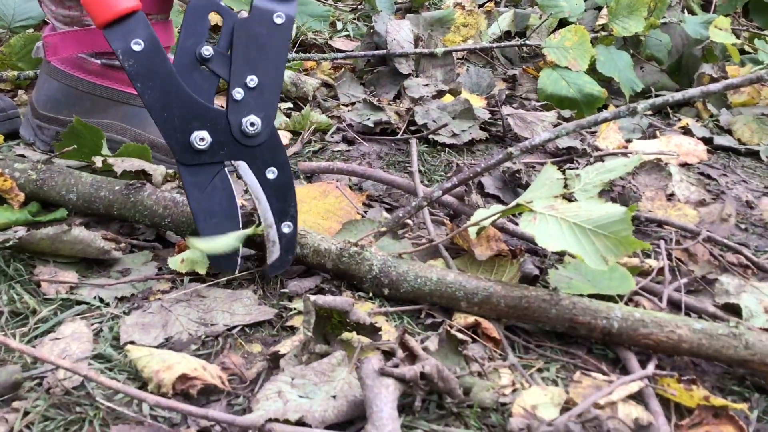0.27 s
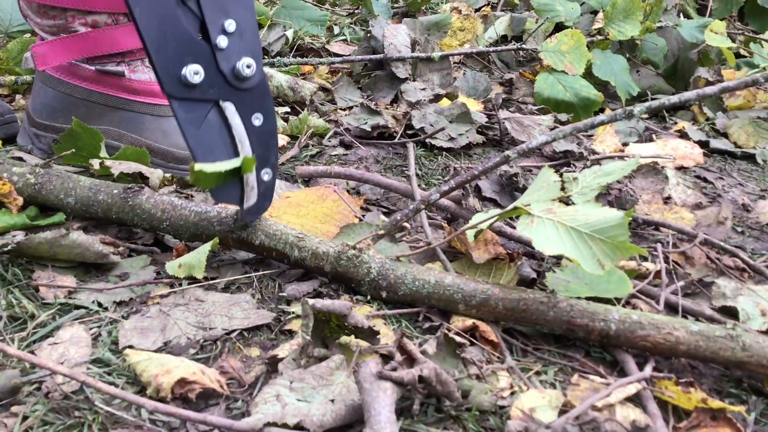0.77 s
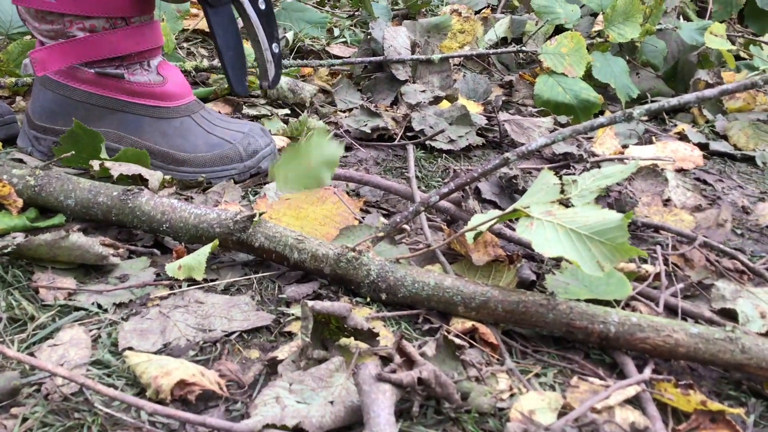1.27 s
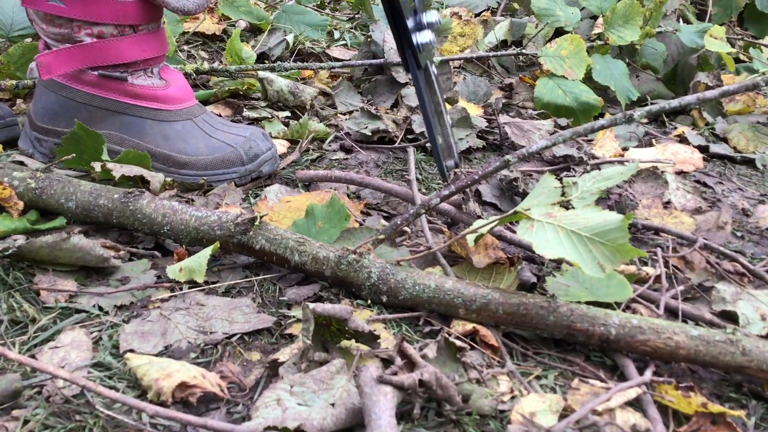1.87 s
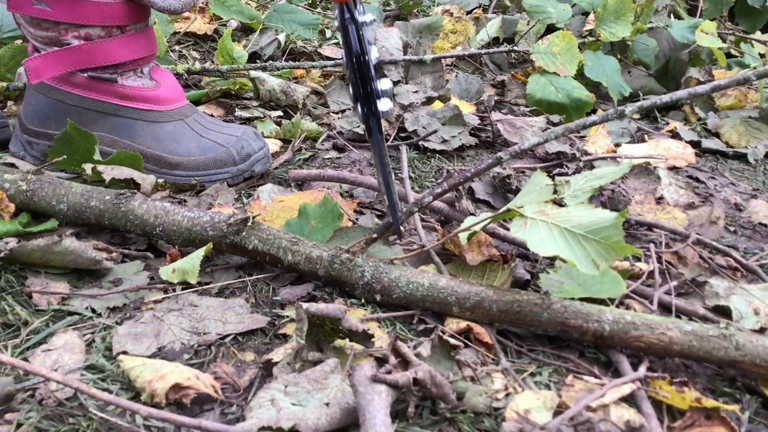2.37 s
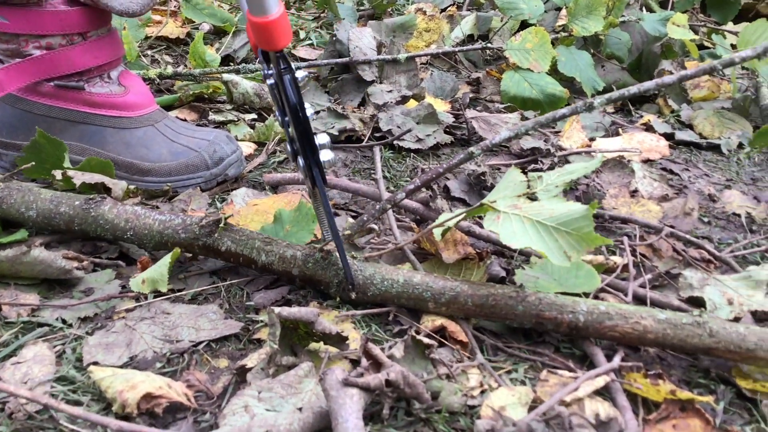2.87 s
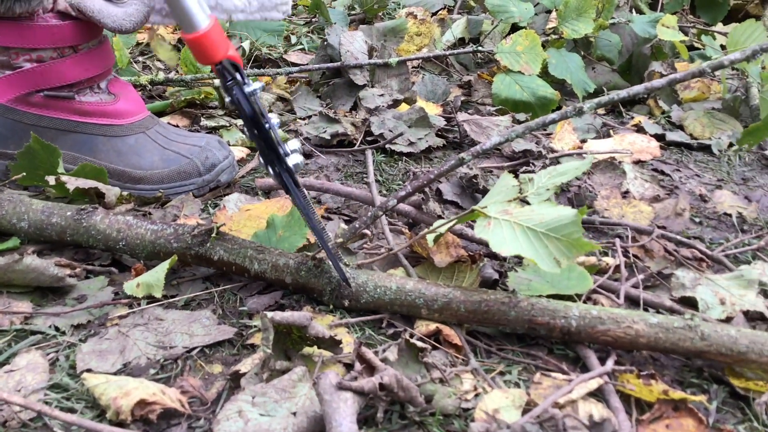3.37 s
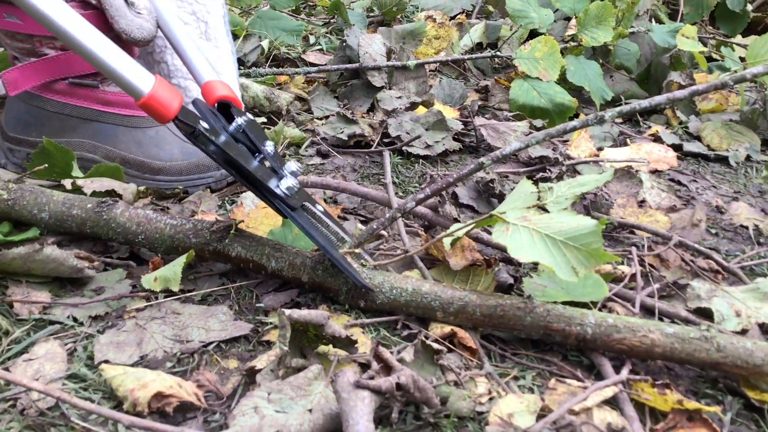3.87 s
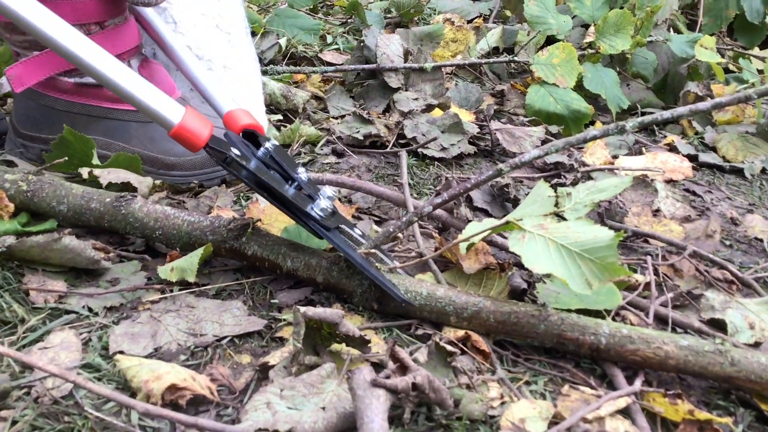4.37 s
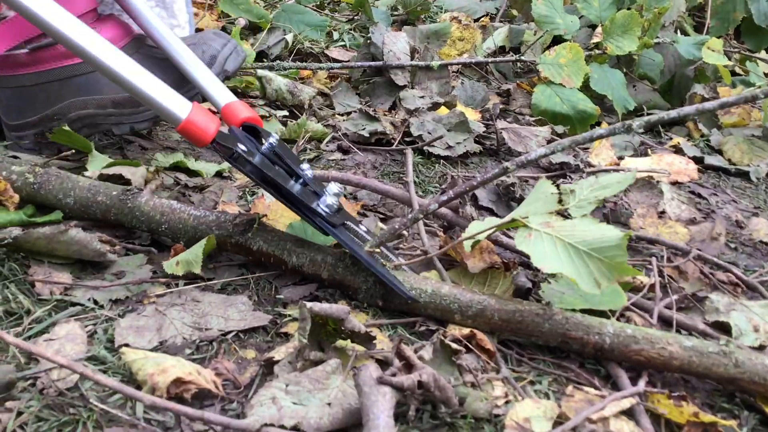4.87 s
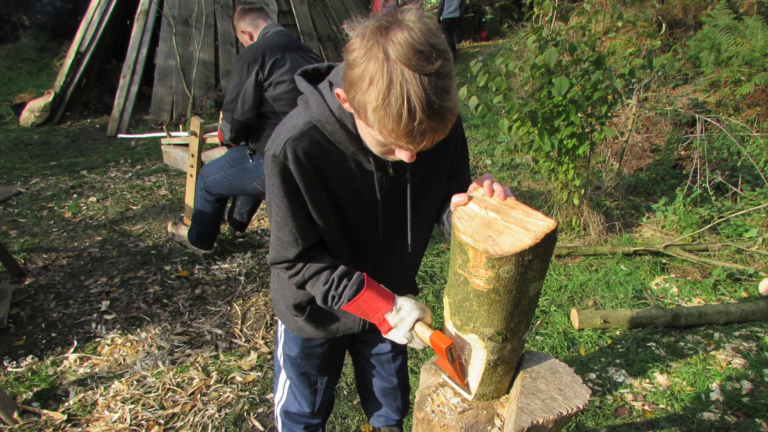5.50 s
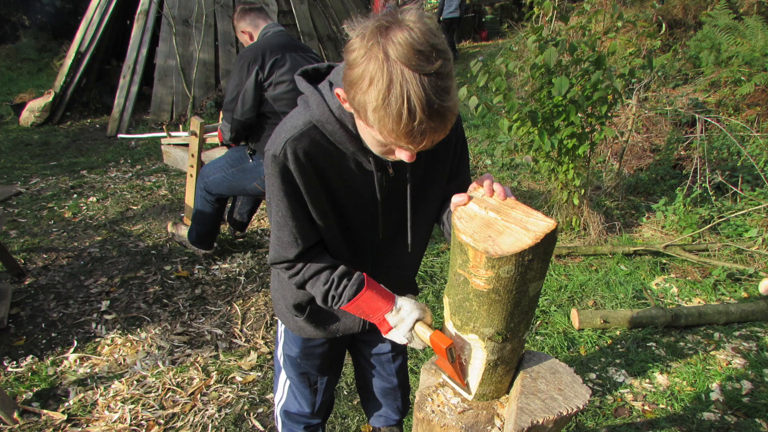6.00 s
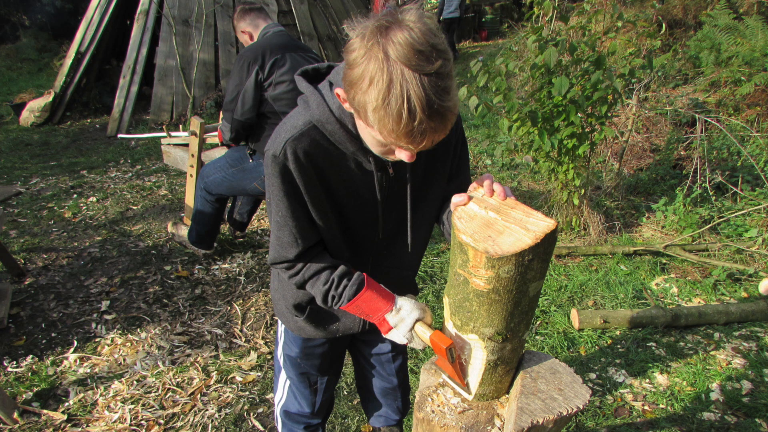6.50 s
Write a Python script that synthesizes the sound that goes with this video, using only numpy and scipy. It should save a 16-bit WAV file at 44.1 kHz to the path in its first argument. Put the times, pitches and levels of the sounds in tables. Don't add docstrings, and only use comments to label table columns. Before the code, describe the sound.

Very close in a quiet wood, long-handled steel loppers tick, then slam shut with a bright hard clack and short metallic ring. Dry leaves and twigs rustle and crackle faintly as the tool is repositioned, with a distant thin bird whistle. After a long quiet stretch the jaws snap loudly through a branch, which tears, crackles and settles before one last smaller clack. Faint low wind rumble on the microphone.

```python
import sys
import numpy as np
from scipy import signal
from scipy.fft import rfft, irfft, next_fast_len
from scipy.io import wavfile
from scipy.ndimage import uniform_filter1d, map_coordinates

SR = 44100
rng = np.random.default_rng(int(sys.argv[2]) if len(sys.argv) > 2 else 0)


def persist_wave(psi):
    counts = np.round(np.clip(psi, -1, 1) * 32767).astype(np.int16)
    wavfile.write(sys.argv[1], SR, np.atleast_2d(counts).T)


def attenuation_scalar(level_db):
    decades = np.asarray(level_db, float) / 20
    return 10 ** decades


N = 297234

# frequency in Hz, level in dB per Hz.
LEAF_COLOUR = [(400, -24.5), (900, -4), (2000, -1), (3400, -2), (5000, -3.5), (6500, -7.5), (8000, -28.5)]
# frequency in Hz, level in dB per Hz.
CRISP_COLOUR = [(5500, -33.5), (6800, 0.5), (8300, -1), (9500, -6.5), (11000, -9.5), (13000, -5.5),
                (15600, -13.5)]


def unit(x):
    return x / np.sqrt(np.mean(x ** 2) + 1e-20)


def along(points, hz):
    f, v = np.transpose(points)
    return np.interp(np.log(hz + 1), np.log(f + 1), v)


def curves(rows):
    s, *cols = np.transpose(rows)
    return [np.interp(np.arange(N) / SR, s, c) for c in cols]


def wobble(rate):
    knots = rng.standard_normal(int(N * rate / SR) + 4)
    return map_coordinates(knots, [np.arange(N) * rate / SR])


def filtered(x, response):
    m = next_fast_len(N + SR // 2)
    return irfft(rfft(x, m) * response(np.fft.rfftfreq(m, 1 / SR)), m)[:N]


def coloured(x, spectrum):
    return unit(filtered(x, lambda hz: attenuation_scalar(along(spectrum, hz))))


def modes(table):
    def response(f):
        total = 0
        for k, (centre, width, db) in enumerate(table):
            damping = 1j * f * width
            total = total + (-1) ** k * attenuation_scalar(db) * damping / (centre * centre - f * f + damping)
        return total
    return response


def add(track, s, sound):
    track[round(s * SR):][:len(sound)] += sound


def jaws():
    # start in seconds, level in dB, length in seconds,
    # brightness in dB.
    pivot = [(0.537, -31, 0.0018, -3), (0.5443, -36, 0.0027, 11), (0.8646, -40, 0.0029, -7),
             (0.9719, -12.5, 0.0027, -2), (1.036, -43, 0.0048, 5), (1.229, -58, 0.0024, -6.5),
             (2.6295, -52, 0.003, -5), (4.4014, -42, 0.0027, 19)]
    edge = [(.943, -52.5, 0.009, -9), (0.9721, -8, .0022, -1), (.9742, -11.5, 0.0018, 4.5),
            (5.3884, -8.5, 0.0024, -2), (5.392, -26.5, .0024, -3), (5.403, -45, 0.0028, -3)]
    heel = [(4.431, -40, 0.00159, -1.5), (4.4355, -40.5, 0.0029, 1.5), (5.3888, -38, .0011, 10),
            (6.351, -36, 0.00142, 1)]
    bark = [(.537, -48, 0.0039, -3.5), (.5445, -44.5, 0.0072, 1), (.5525, -45, 0.0021, 2),
            (.875, -61.5, .002, 0), (0.9362, -52.5, 0.0033, -3), (.968, -51.5, .0023, 6),
            (2.471, -51.5, 0.0043, -3), (4.394, -69, .0019, 0), (4.4, -47, 0.0058, -3),
            (4.438, -54.5, 0.0049, 0), (5.38, -56.5, 0.0034, -6.5), (6.2723, -52.5, 0.0034, -2.5),
            (6.2868, -63, 0.0021, 3.5), (6.3471, -36.5, 0.0024, 0)]
    rebound = [
        (.9762, -13, .001, 5),
    ]
    # low, middle and high mode groups in dB, crack in dB.
    part_levels = [
        (-15, 1, -22, -14.5),
        (-14, -12.5, 0, -8),
        (-1.5, -18, -20, -11.5),
        (-2, -1.5, -6, 1),
    ]
    # frequency in Hz, width in Hz, level in dB.
    head_low = [(1075, 100, -3.5), (1350, 180, -5), (1640, 250, -1), (2060, 190, -5.5)]
    head_mid = [(2540, 560, -7), (3254, 200, 2.5), (3620, 260, 2.5)]
    head_high = [(8400, 1400, -7.5), (9570, 440, -5.5), (11400, 520, -6), (12560, 360, -0.5),
                 (13200, 760, -0.5), (15300, 1100, -10)]
    # frequency in Hz, level in dB per Hz.
    crack_colour = [(300, -31.5), (1000, -15), (3500, -9.5), (5000, -1.5), (7200, -0.5), (9000, -7),
                    (16000, -16)]

    t = np.arange(SR // 40) / SR
    drive = np.zeros((4, N + SR))
    rebound_levels = part_levels[1]
    groups = zip((pivot, edge, heel, bark, rebound), [*part_levels, rebound_levels])
    for rows, part in groups:
        for s, db, length, bright_db in rows:
            levels_db = db + np.array(part) + bright_db * np.array([-1, 0, 1, 0])
            shape = (1 - np.exp(-t / 0.00023)) * np.exp(-(t / length) ** 0.99)
            for track, level_db in zip(drive, levels_db):
                burst = shape * rng.standard_normal(len(t))
                first_touch = 4 * (t == 0)
                add(track, s, attenuation_scalar(level_db) * (burst + first_touch))
    low = filtered(drive[0], modes(head_low))
    mid = filtered(drive[1], modes(head_mid))
    high = filtered(drive[2], modes(head_high))
    crack = filtered(drive[3], lambda hz: attenuation_scalar(along(crack_colour, hz)))
    return attenuation_scalar(17) * low + attenuation_scalar(13.0) * mid + attenuation_scalar(11.5) * high + attenuation_scalar(5.5) * crack


def struck():
    # frequency in Hz, level in dB, swell in seconds, time to fall 60 dB in seconds.
    shut = [(2046, -31, 0.00042, 0.07), (2190, -42, .002, 0.12), (2700, -30, .0005, .07),
            (5660, -35, .0005, .055), (3300, -15, 0.0002, .03), (3610, -18, 0.00028, .025),
            (7140, -25, .0005, 0.046), (8540, -14, 0.0012, .11), (13426, -20.5, .001, 0.038)]
    free = [(3610, -53, .03, .7), (4150, -56, .004, .85), (4600, -38, .001, .05), (5600, -65, .01, 0.6),
            (6367, -63, .02, .55), (6900, -62, .01, .37)]
    biting = [(3180, -64.5, .005, 0.5), (3350, -56, .01, 0.55), (4465, -63, .01, 0.33)]
    # start in seconds, level in dB, share of ringing time left.
    bites = [
        (5.39, -0.5, 1.3),
        (6.348, -1, 0.43),
    ]
    # start in seconds, level in dB, favoured overtone,
    # dB lost per overtone away from it, share of ringing time kept per overtone.
    tube_knocks = [(.974, -50, 2.7, 7, .9), (1.0308, -51, 2.15, 5.5, 0.78), (5.39, -53.5, 1.01, 6.5, 0.34),
                   (5.487, -54, 3, 39, 0.86), (6.13, -65.5, 1.01, 23.5, .99), (6.349, -65, 2.4, 8, .99)]
    # start in seconds, frequency
    # in Hz, level in dB, time to fall 60 dB in seconds.
    pings = [(5.4105, 7600, -40, .012), (5.412, 3750, -42, .03), (5.42, 2180, -65, .4),
             (5.6, 547, -66, 1.2), (5.996, 1100, -44, .012), (5.996, 3100, -42, .012),
             (5.41, 2570, -58, .2), (4.432, 1400, -40, .03), (6.684, 6800, -60, .012),
             (6.684, 5200, -62, .012), (6.697, 3400, -60, .015), (1.229, 2650, -58, .02),
             (1.229, 3680, -54, .02), (1.185, 1400, -57, .02), (1.17, 2450, -59, .02),
             (2.63, 3350, -50, .025), (.985, 13400, -46, .2), (1.026, 13400, -51, .04),
             (.99, 3720, -50, .15), (1.04, 3040, -60, .3), (1.07, 4750, -72, .5), (1.09, 1640, -64, .3),
             (3.848, 1320, -66, .08), (3.85, 680, -68, .08), (5.766, 6500, -50, .015),
             (5.834, 6500, -50, .02), (4.9245, 2000, -50, .006),
             (.538, 1094, -47.5, 0.037), (.865, 3410, -42, 0.028), (.865, 2600, -48, .03),
              (2.471, 1780, -57, .03), (2.471, 2520, -57, .03), (5.389, 1050, -32.5, 0.05),
              (5.389, 1696, -27, 0.037), (5.389, 3360, -24, 0.036), (5.388, 6150, -19, .02),
              (5.49, 1370, -60, .3), (1.0365, 3310, -31, 0.022), (.5455, 2370, -34, 0.021),
              (6.273, 1085, -60, 0.053), (6.273, 1666, -54, 0.033), (6.349, 2390, -60, 0.15),
              (6.349, 3670, -58, .15), (.5375, 3610, -25, 0.016), (.5443, 3620, -22, 0.014),
              (.545, 8500, -37, 0.022), (.941, 8500, -44, 0.024), (2.471, 1260, -51, 0.066),
              (4.406, 8500, -45, 0.041), (5.3886, 2577, -24, 0.028), (5.3878, 10600, -6, 0.0094),
              (5.392, 8500, -17, 0.034), (6.347, 1586, -33.5, 0.04), (6.347, 3700, -35.5, 0.025),
              (6.348, 8300, -41, 0.022), (6.351, 13200, -66, 0.048), (6.37, 740, -71, 0.44)]
    snap_s = .9721
    tube_hz, tube_swell_s = 547, 0.009
    tube_t60 = (0.96, 2, 0.81, .55)  # seconds, by overtone
    ping_swell_s = 0.00066

    rows = [(snap_s, *mode) for mode in [*shut, *free]]
    for s, more_db, left in bites:
        for hz, db, swell, t60 in biting:
            rows.append((s, hz, db + more_db, swell, t60 * left))
    for s, db, best, loss_db, kept in tube_knocks:
        for k, t60 in enumerate(tube_t60):
            level_db = db - loss_db * abs(k + 1 - best)
            rows.append((s, (k + 1) * tube_hz, level_db, tube_swell_s, t60 * kept ** k))
    for s, hz, db, t60 in pings:
        rows.append((s, hz, db, ping_swell_s, t60))
    return rows


def rings():
    # start in seconds, time to fall 60 dB in seconds,
    # highest frequency damped in Hz.
    grip = (1.067, 0.36, 2500)
    # from Hz, to Hz, glide per second.
    sag = [(3500, 3900, -.5), (3900, 4400, -.33)]
    grip_s, grip_t60, below_hz = grip
    part_s, part_t60 = 1.021, .015
    flutter_db, flutter_per_s = 12, 130

    out, t = np.zeros(N + SR), np.arange(SR) / SR
    for s, hz, db, swell, t60 in struck():
        chance = rng.random(200)
        glide_rate = sum(rate * (s < grip_s and lo < hz < hi) for lo, hi, rate in sag)
        glide = glide_rate * np.exp(-t / .8)
        phase = 2 * np.pi * hz * (t + glide * t * t / 2)
        beat = 1 + .25 * np.sin(2 * np.pi * (9 * (chance[0] + .5) * t + chance[1]))
        if hz > below_hz and t60 > .06:
            beat *= attenuation_scalar(flutter_db * np.interp(t * flutter_per_s, np.arange(200), chance - .5))
        held = (s < grip_s and hz < below_hz) * np.maximum(s + t - grip_s, 0) / grip_t60
        held += (s < part_s and hz > 8000) * np.maximum(s + t - part_s, 0) / part_t60
        bloom = (1 - np.exp(-t / swell)) ** 2
        add(out, s, attenuation_scalar(db - 60 * (t / t60 + held)) * bloom * beat * np.sin(phase))
    return out[:N]


def scrapes():
    # start in seconds, end in seconds, level in dB rms, pitch in Hz.
    rubs = [(0.494, .538, -73, 3550), (.215, .245, -74, 3400), (.425, .455, -73, 3450),
            (.688, .718, -67, 8580), (.725, .74, -74, 3400), (2.52, 2.61, -71, 3240),
            (2.605, 2.67, -62.5, 3300), (3.931, 3.995, -75, 3400), (4.018, 4.06, -73, 2350),
            (4.089, 4.134, -75, 3450), (5.469, 5.511, -59, 3380), (5.52, 5.57, -66, 3330)]
    width_hz, edge_s = 220, .012
    out, t = np.zeros(N + SR), np.arange(SR // 5) / SR
    for start, end, db, hz in rubs:
        noise = rng.standard_normal((2, len(t)))
        grit = noise[0] * attenuation_scalar(2.5 * unit(uniform_filter1d(noise[1], size=200)))
        ring = np.sin(2 * np.pi * hz * t) * np.exp(-np.pi * width_hz * t)
        contact = np.clip(np.minimum(t, end - start - t) / edge_s, 0, 1)
        add(out, start, attenuation_scalar(db) * contact * unit(signal.fftconvolve(grit, ring)[:len(t)]))
    return out[:N]


def twigs():
    # start in seconds, peak in dB, pitch in Hz, treble in dB.
    stalks = [(0.054, -60, 3550, -63), (0.2345, -63, 3400, -60), (0.2415, -61, 3530, -59),
              (0.3152, -57, 3300, -64), (.2065, -68, 3070, -62), (.3337, -66, 3480, -57),
              (.38, -66, 3000, -60), (.465, -64, 4500, -61), (.7682, -60, 4320, -72),
              (.7946, -58, 3460, -57), (2.592, -66, 3500, -58), (2.605, -66, 3500, -58),
              (2.809, -62, 4500, -60), (2.857, -63, 4000, -72), (0.456, -54, 2400, -67),
              (0.9037, -62, 2820, -64), (1.1698, -58, 3390, -71.5), (1.1797, -58, 2100, -68),
              (1.3362, -48, 2190, -48.5), (1.438, -58.5, 2150, -63), (1.9896, -59.5, 4153, -76.5),
              (2.6423, -56, 3370, -48.5), (2.6625, -49.5, 1500, -55), (2.5243, -60.5, 4200, -63),
              (2.5677, -61, 3300, -61), (2.6096, -61, 3590, -60), (4.0171, -63, 2400, -62),
              (4.197, -58, 2994, -66), (2.7818, -57, 1350, -62), (2.8407, -64.5, 1640, -62.5),
              (3.5221, -55, 3143, -66.5), (3.5824, -63.5, 1407, -57), (4.0526, -58.5, 1270, -64.5),
              (4.256, -60, 3596, -80.5), (4.622, -56.5, 1580, -63), (4.723, -59.5, 2735, -63),
              (4.9247, -51, 1395, -66), (5.0486, -62, 2785, -77), (5.2007, -59, 3803, -61),
              (5.3377, -55.5, 4710, -69.5)]
    splinters = [(5.438, -50, 3770, -55), (5.5092, -58, 1680, -47.5), (5.672, -53.5, 1900, -65),
                 (5.483, -70, 3000, -54), (5.492, -66, 3300, -53), (5.845, -54, 4500, -58),
                 (5.705, -56, 4500, -58), (5.5284, -73, 1640, -47), (5.5703, -43, 2700, -46),
                 (5.7673, -49.5, 3550, -49.5), (5.7882, -55, 1350, -51.5), (5.8125, -51, 3360, -48),
                 (5.8263, -48, 3690, -47.5), (5.9662, -51.5, 2295, -55.5), (5.989, -42, 2190, -44),
                 (5.9955, -37, 1700, -44), (6.0084, -38.5, 997, -60), (6.0176, -52, 2810, -38.5),
                 (6.0288, -47, 4340, -58), (6.0506, -52, 4650, -57.5), (6.0608, -53, 3440, -53)]
    t = np.arange(SR // 40) / SR
    body, treble = np.zeros((2, N + SR))
    for s, db, hz, treble_db in [*stalks, *splinters]:
        noise = rng.standard_normal((2, len(t)))
        tone = 1.5 * np.sin(2 * np.pi * hz * t) * np.exp(-t / 0.0018)
        tick = 1.8 * noise[0] * np.exp(-t / 0.00243)
        add(body, s, attenuation_scalar(db) * (tone + tick))
        add(treble, s, attenuation_scalar(treble_db) * noise[1] * np.exp(-t / 0.0018))
    snap = filtered(body, lambda hz: attenuation_scalar(along(LEAF_COLOUR, hz)))
    spit = filtered(treble, lambda hz: attenuation_scalar(along(CRISP_COLOUR, hz)))
    return snap + attenuation_scalar(5.5) * spit


def thuds():
    # start in seconds, peak in dB, pitch in Hz, time to fall 60 dB in seconds.
    knocks = [(0.543, -45, 420, 0.046), (0.866, -53, 617, 0.045), (.972, -25, 448, 0.017),
              (.972, -35, 190, 0.04), (.972, -33, 110, .04), (4.049, -59, 750, 0.033),
              (4.441, -62.5, 399.5, 0.034), (4.733, -61.5, 424, 0.2), (4.765, -63.5, 250.8, 0.045),
              (4.924, -49.5, 236, 0.039), (5.05, -55, 560, 0.025), (5.202, -47.5, 281.4, 0.045),
              (5.39, -35, 230, .04), (5.39, -32, 518, 0.06), (5.701, -57, 860, 0.035),
              (5.765, -49.5, 348, 0.041), (5.861, -51, 274, 0.033), (5.996, -46, 193, 0.022),
              (5.548, -55.5, 250, .05), (6.685, -61, 308, .04), (2.471, -59.5, 500, 0.041),
              (4.17, -58, 200, 0.058)]
    out, t = np.zeros(N + SR), np.arange(SR // 8) / SR
    for s, db, hz, t60 in knocks:
        noise = rng.standard_normal(len(t))
        puff = 3.1 * uniform_filter1d(noise, size=24) * attenuation_scalar(-60 * t / 0.026)
        note = attenuation_scalar(-60 * t / t60) * np.sin(2 * np.pi * hz * t)
        add(out, s, attenuation_scalar(db) * (note + puff))
    return filtered(out, lambda hz: hz ** 4 / (hz ** 4 + 110 ** 4))


def stirring():
    # peak time in seconds, rustle in dB, rise in seconds,
    # crisp in dB over rustle, dull in dB over rustle.
    stirs = [(.056, -79, 0.023, 6, 1), (0.139, -67, 0.021, -4, -0.5), (0.302, -67.5, 0.18, -6, -7.5),
             (.59, -74, 0.2, -8, -4.5), (.81, -70, .03, -1, -8), (0.842, -69, 0.12, -8.5, -7.5),
             (1.437, -73.5, 0.032, -6, 4.5), (2.055, -73, 0.079, 0, -9), (2.371, -74, 0.041, -3.5, -3),
             (2.695, -74, .03, -3, -9), (2.93, -70.5, 0.0864, -5.5, -12), (3.344, -71, 0.11, -8, -21.5),
             (4.45, -58.5, 0.066, -5, -4.5), (5.2, -65, 0.073, -2, -5), (6.008, -56.5, 0.13, -5.5, -6)]
    # start in seconds, end in seconds, rustle in dB,
    # crisp in dB over rustle, dull in dB over rustle.
    drags = [(0.327, 0.525, -72.5, -2, -10), (0.685, 0.736, -72.5, 1.5, -9.5), (1.059, 1.379, -71, 0, -5.5),
             (1.461, 2.0, -86, -4.5, -1.5), (2.535, 2.59, -68.5, -5, -10.5),
             (2.609, 2.662, -62.5, -3.5, -12), (2.715, 2.815, -69, -3, -9), (3.0, 3.401, -79, -2.5, -6),
             (3.457, 3.609, -71.5, 0, -5), (3.627, 3.942, -74, -4.5, -6), (3.969, 4.194, -69.5, -2, -6.5),
             (4.226, 4.743, -71.5, -6, -8), (4.761, 5.365, -73, -5, -4.5), (5.42, 5.682, -64, -5, -4.5),
             (5.695, 5.73, -61, -3.5, -6.5), (5.73, 5.76, -65, -3.5, -6.5),
             (5.762, 5.848, -59.5, -3.5, -6.5), (6.067, 6.168, -70.5, -4, -7),
             (6.18, 6.549, -81.5, -2, 3.5), (6.57, 6.8, -74, -4.5, -1.5)]
    # start in seconds, rustle in dB, fall in seconds,
    # crisp in dB over rustle, dull in dB over rustle.
    showers = [
        (.982, -50.5, 0.088, 0, -22.5),
        (5.397, -45.5, 0.034, 2, -6.5),
    ]
    # rustle in dB, crisp in dB, dull in dB.
    resting_db = (-95.5, -95, -83.5)
    edge_db = 15
    fall_over_rise, drag_edge_s, shower_rise_s = 0.81, 0.029, .006

    moves = [(s, s, rise, fall_over_rise * rise, db, *over) for s, db, rise, *over in stirs]
    moves += [(a, b, drag_edge_s, drag_edge_s, *levels) for a, b, *levels in drags]
    moves += [(s, s, shower_rise_s, fall, db, *over) for s, db, fall, *over in showers]
    t = np.arange(0, N + 64, 64) / SR
    power = attenuation_scalar(2 * np.array(resting_db))[:, None] * np.ones(len(t))
    for start, end, rise, fall, db, crisp_db, dull_db in moves:
        away = np.maximum(start - t, 0) / rise + np.maximum(t - end, 0) / fall
        over_db = np.array([[0], [crisp_db], [dull_db]])
        power += attenuation_scalar(2 * (db + over_db - edge_db * away))
    return [np.interp(np.arange(N) / SR, t, np.sqrt(p)) for p in power]


def crackle(rate, spread_db, life, share):
    sizes = attenuation_scalar(spread_db * np.tanh(rng.standard_normal(N)))
    starts = (rng.random(N) < rate / SR) * sizes
    bursts = signal.fftconvolve(starts, np.exp(-np.arange(SR // 50) / SR / life))[:N]
    return (1 + share * unit(bursts)) * rng.standard_normal(N)


def leaves():
    # frequency in Hz, level in dB per Hz.
    dull_colour = [(90, -30.5), (160, -1), (280, -0.5), (500, 0.5), (900, -5), (1300, -30.5)]
    air_colour = [(76, -33.5), (130, -4), (253, -4.5), (453, -18), (1080, -8.5), (1520, -12), (2560, -12.5),
                  (7750, -23.5), (14500, -29.5), (16000, -40)]
    leaf_gain, crisp_gain, dull_gain = stirring()
    clumps = attenuation_scalar(1.2 * wobble(30))
    leaf = coloured(clumps * crackle(rate=380, spread_db=7, life=0.0022, share=.7), LEAF_COLOUR)
    leaf += 0.47 * filtered(leaf, modes([(3370, 250, 0)]))
    crisp = coloured(clumps * crackle(rate=160, spread_db=9, life=0.0025, share=0.45), CRISP_COLOUR)
    crisp += .5 * filtered(crisp, modes([(8500, 510, 0.00083)]))
    dull_clumps = attenuation_scalar(1.5 * np.tanh(wobble(15)))
    dull = coloured(dull_clumps * crackle(rate=36, spread_db=5.5, life=0.0018, share=.3), dull_colour)
    air = attenuation_scalar(-76.0) * coloured(rng.standard_normal(N), air_colour)
    return leaf_gain * leaf + crisp_gain * crisp + dull_gain * dull + air


def breeze():
    # time in seconds, level in dB rms.
    sway = [(0, -31.5), (.35, -23), (.67, -33), (1.14, -30.5), (1.24, -41), (1.5, -30.5), (2.16, -18.5),
            (2.4, -36), (2.55, -28.5), (3.1, -22.5), (3.25, -30), (4.1, -34), (4.4, -43.5), (5.0, -38.5),
            (5.25, -27.5), (6.12, -26), (6.32, -43), (6.6, -32)]
    # frequency in Hz, level in dB per Hz.
    gust_colour = [(10, 11.5), (20, 7.5), (28, 1), (45, -8.5), (85, -1.5), (130, -12), (220, -46.5)]
    lump_colour = [(70, -31.5), (120, -3), (240, 0.5), (380, -29.5)]
    rumble_db, rumble_follows, rumble_lag_s = -65, .7, 0.27

    sway_db, = curves(sway)
    gust_db = uniform_filter1d(sway_db - sway_db.mean(), int(rumble_lag_s * SR))
    rate = 5.0 * np.exp(.45 * wobble(4.5))
    rocking = -np.sqrt(2) * np.cos(2 * np.pi * np.cumsum(rate) / SR) + 0.32 * wobble(6.1)
    settle = np.clip((N - np.arange(N)) / (.15 * SR), 0, 1)
    rumble = attenuation_scalar(3.0 * wobble(8.7)) * coloured(rng.standard_normal(N), gust_colour)
    lumps = attenuation_scalar(5.4 * np.tanh(wobble(9.4))) * coloured(rng.standard_normal(N), lump_colour)
    out = settle * attenuation_scalar(sway_db) * unit(rocking)
    out += attenuation_scalar(rumble_db + rumble_follows * gust_db) * unit(rumble)
    return out + attenuation_scalar(-85.5) * unit(lumps)


def eddies():
    # middle in seconds, level in dB, pitch in Hz, length in seconds.
    thumps = [(0.515, -64, 60, .25), (1.85, -66, 52, .3), (2.147, -66.5, 95, .25), (3.047, -60, 44, .3),
              (3.198, -62, 62, .2), (3.446, -66, 30, .2), (5.76, -60.5, 52, .25), (5.997, -60, 45, .25),
              (4.93, -67.5, 130, .08), (4.6, -73, 200, .1), (5.991, -64, 135, .08), (5.395, -52, 175, .03),
              (2.68, -70, 240, .08), (4.43, -70, 140, .08)]
    out, t = np.zeros(N + SR), np.arange(SR // 2) / SR
    for s, db, hz, length in thumps:
        drift = 1 + .06 * unit(uniform_filter1d(rng.standard_normal(len(t)), size=2000))
        swell = np.sin(np.pi * np.clip(t / length, 0, 1)) ** 2
        add(out, s - length / 2, attenuation_scalar(db) * swell * np.sin(2 * np.pi * hz * np.cumsum(drift) / SR))
    return out[:N]


def bird():
    # time in seconds, pitch in Hz, level in dB rms.
    calls = [
        [(1.89, 5660, -94.5), (1.932, 5600, -83.5), (2.0, 5540, -88), (2.03, 5521, -92), (2.075, 5560, -90)],
        [(3.85, 5600, -88), (3.9, 5670, -83), (3.97, 5642, -89)],
    ]
    out, t = np.zeros(N), np.arange(N) / SR
    for call in calls:
        hz, db = curves(call)
        on = (t > call[0][0]) & (t < call[-1][0])
        out += on * attenuation_scalar(db + 5.5 + 2.5 * wobble(41.7)) * np.sin(2 * np.pi * np.cumsum(hz) / SR)
    return out


def trunks(x):
    # frequency in Hz, time to fall 60 dB in seconds.
    echo_t60 = [(300, 0.067), (3000, .16), (14000, 0.083)]
    hz, t, z = signal.stft(rng.standard_normal(SR // 2), SR, nperseg=256)
    fade = attenuation_scalar(-60 * t / along(echo_t60, hz)[:, None])
    tail = signal.istft(z * fade, SR, nperseg=256)[1]
    return signal.fftconvolve(x, tail / np.linalg.norm(tail))[:N]


def scene():
    blows = jaws() + twigs() + thuds()
    tool = blows + attenuation_scalar(-25.5) * trunks(blows) + rings() + scrapes()
    wood = leaves() + breeze() + eddies() + bird()
    return (tool + wood)[None]


def low_pass(x):
    return signal.sosfilt(signal.butter(12, 16930, fs=SR, output="sos"), x)


def record(dry):
    loud = dry[0] / (1 + np.abs(dry[0] / .95) ** 5) ** (1 / 5)
    mix = filtered(loud, lambda hz: (hz > 1) & (hz < 16500))[None]
    return low_pass(mix)


dry = scene()
out = record(dry)
persist_wave(out)
```